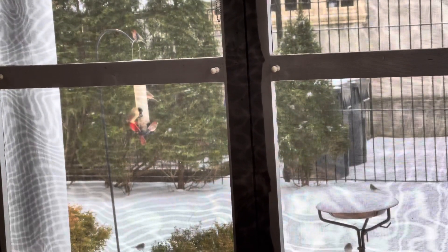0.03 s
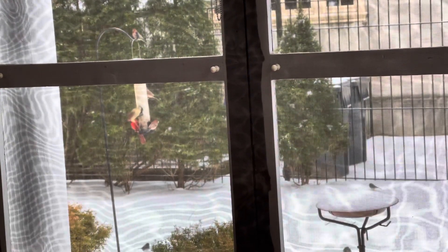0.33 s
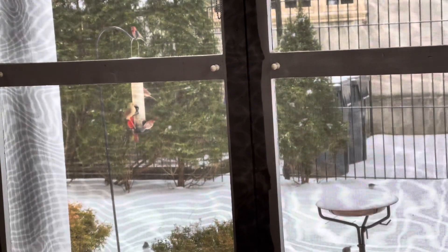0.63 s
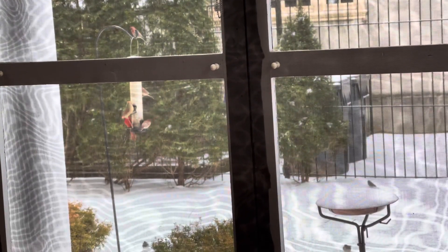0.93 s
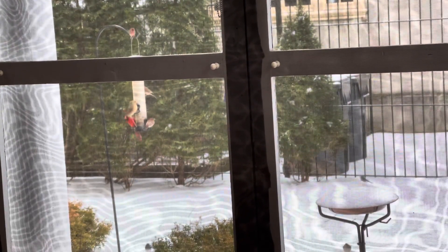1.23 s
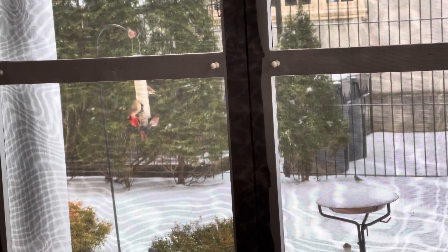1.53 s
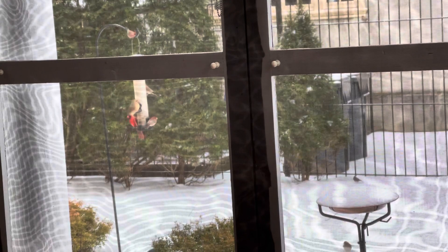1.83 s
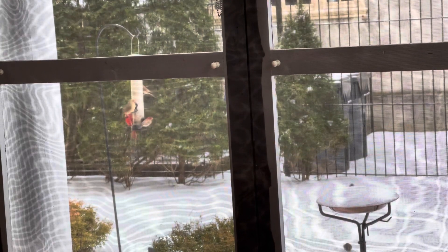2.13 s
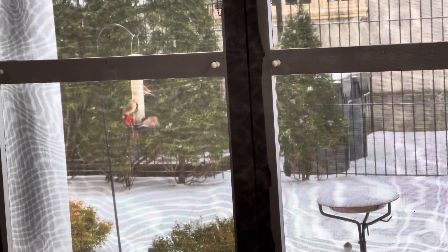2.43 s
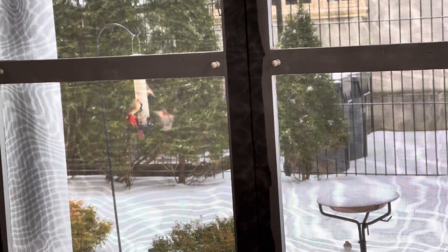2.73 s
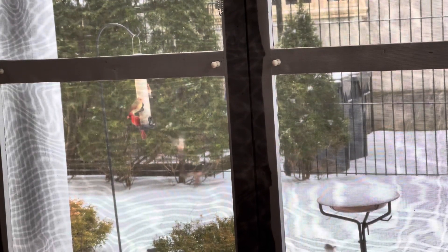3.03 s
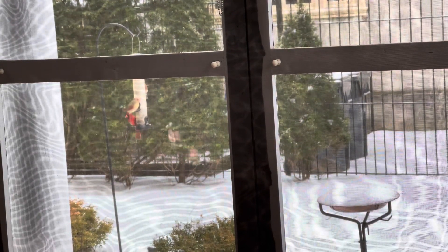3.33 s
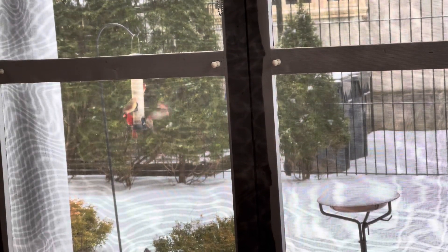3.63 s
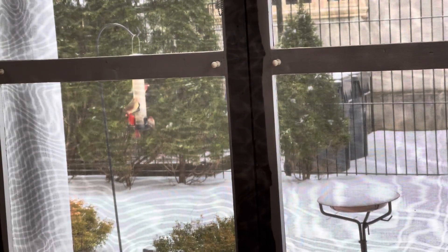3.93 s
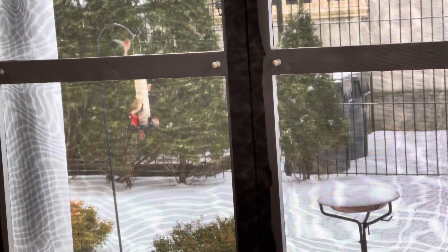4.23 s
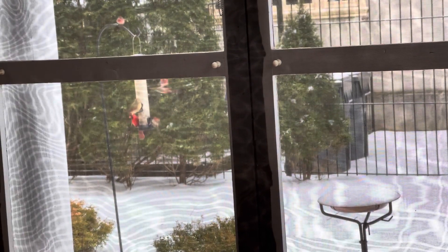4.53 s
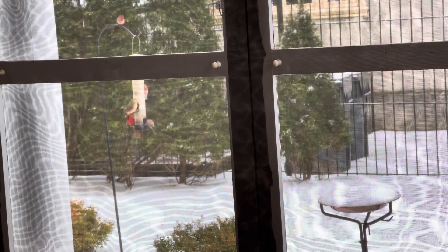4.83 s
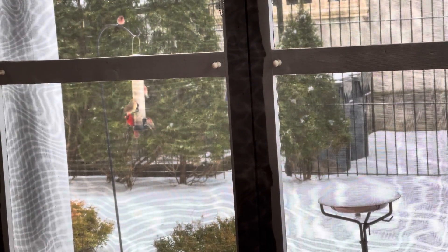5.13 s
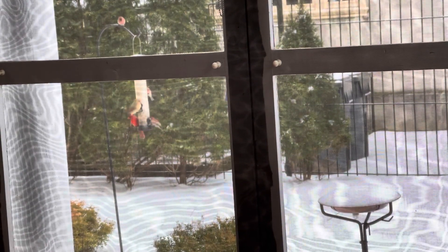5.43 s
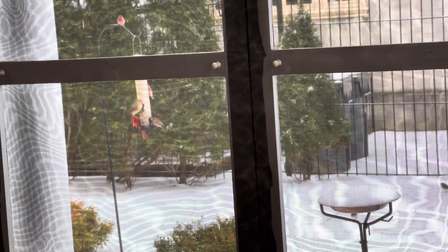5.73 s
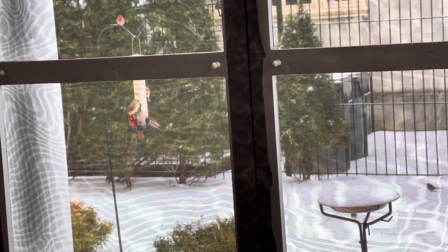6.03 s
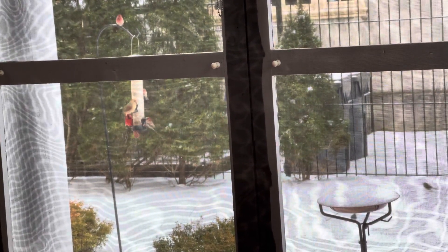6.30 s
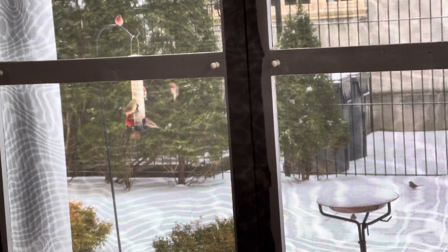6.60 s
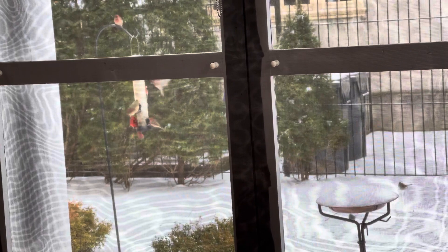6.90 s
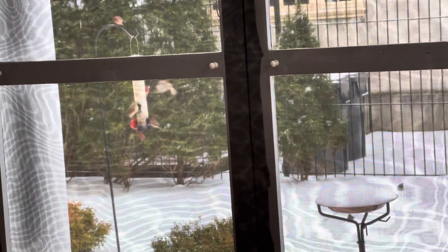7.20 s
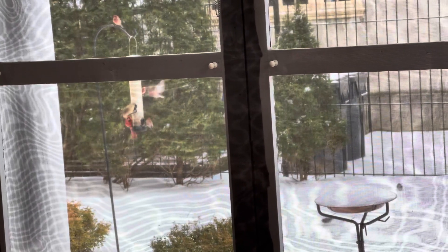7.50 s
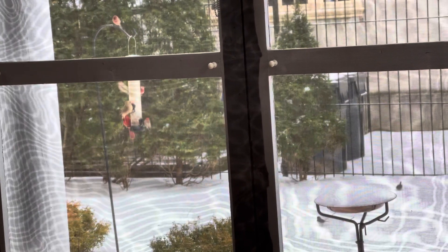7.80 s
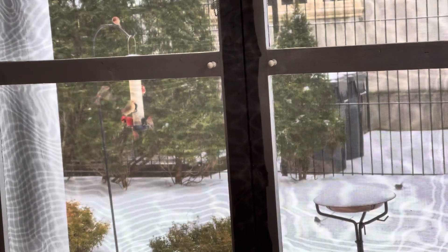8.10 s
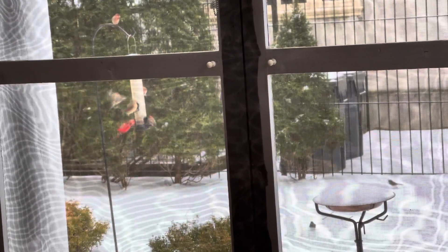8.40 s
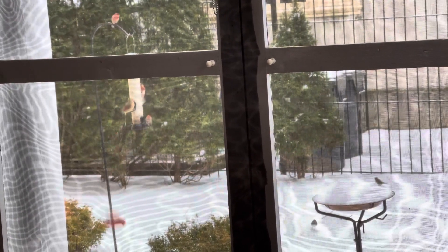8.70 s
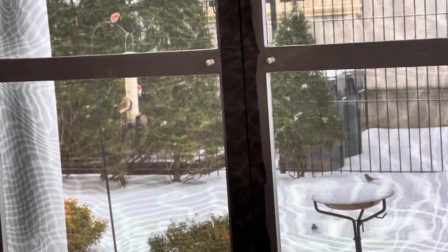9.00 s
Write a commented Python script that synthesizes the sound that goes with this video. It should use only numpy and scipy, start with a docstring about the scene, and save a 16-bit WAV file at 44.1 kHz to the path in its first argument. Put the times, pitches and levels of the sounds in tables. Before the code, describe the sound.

Small birds chirp softly around a feeder over the constant high hiss of falling ice grains and a few faint, crisp clicks. After the first run of chirps come a brief high whistle and very faint, distant piping. Then one sharp knock rings briefly off the yard walls as clearer chirps follow, with a last pair after a pause. The hand-held microphone picks up a low, uneven rumble and soft bumps.

```python
"""Birds at a feeder in the sleet

Small birds chirp in short series in a snowy yard, each singing with both sides of its voice box.
One bird gives a thin high whistle, another pipes far away; there is one sharp knock and a few clicks.
Countless ice grains make a steady hiss, and walls throw the other sounds back.
A low rumble and soft handling bumps reach the hand-held microphone."""
import sys
import numpy as np
from scipy import signal
from scipy.fft import rfft, irfft
from scipy.io import wavfile

SR = 44100
rng = np.random.default_rng(int(sys.argv[2]) if len(sys.argv) > 2 else 0)


def bounce(signal):
    """Save signal as a 16-bit WAV file at the path given by the first command-line argument."""
    frames = np.transpose(np.atleast_2d(signal))
    limited = np.clip(frames, -1, 1)
    pcm = np.round(limited * 32767).astype(np.int16)
    wavfile.write(sys.argv[1], SR, pcm)


N = 403515
TIME = np.arange(N) / SR


def gain_of(db):
    """Turns decibels into a number to multiply a sound by."""
    return 10 ** (np.asarray(db) / 20)


def evened(x):
    """Scales a signal to an average (rms) size of one."""
    return x / np.sqrt(np.mean(x ** 2) + 1e-20)


def value_at(points, hz):
    """Looks up a curve between its points, with frequency spaced by octaves."""
    f, value = np.transpose(points)
    return np.interp(np.log(hz + 1), np.log(f + 1), value)


def add(mix, s, sound):
    """Mixes a sound in, starting at s seconds."""
    part = mix[..., max(round(s * SR), 0):][..., :sound.shape[-1]]
    part += sound[..., :part.shape[-1]]


def wander(size, rate_hz):
    """A smooth random wobble of average size one."""
    hz = np.fft.rfftfreq(size, 1 / SR)
    return evened(irfft(rfft(rng.standard_normal(size)) * np.exp(-(hz / rate_hz) ** 2), size))


def phase_of(hz):
    """The running angle of a wave whose pitch changes."""
    return 2 * np.pi * np.cumsum(hz) / SR


def filtered(x, order, hz, kind):
    """Keeps what is above one frequency ("high") or between two ("band")."""
    return signal.sosfilt(signal.butter(order, hz, kind, fs=SR, output="sos"), x)


# Each row: frequency in Hz, how alike left and right are (1 means the same).
STEREO_LIKENESS = [(60, 1), (125, 1), (250, 0.92), (600, 0.67), (1000, 0.445), (1600, 0.52), (2200, 1),
                   (3200, 1), (6000, 1), (14000, 1)]


def coloured(pair, spectrum):
    """Gives two unrelated noises a tone colour and makes them partly alike."""
    hz, (a, b) = np.fft.rfftfreq(N, 1 / SR), rfft(pair)
    same = np.clip(value_at(STEREO_LIKENESS, hz), -1, 1)
    stereo = np.array([a, same * a + np.sqrt(1 - same ** 2) * b])
    return evened(irfft(stereo * gain_of(value_at(spectrum, hz)), N))


# How long the yard rings. Each row: frequency in Hz, seconds to fade by 60 dB.
YARD_FADE = [(300, 0.37), (1300, 0.36), (3500, 0.32), (8000, 0.2), (14000, 0.15)]


def yard(x, near_db, tail_db, spread=0.15, near_s=0.0087):
    """Adds quick bounces off nearby surfaces, then a fading tail scattered by fence and hedge."""
    size = SR * 3 // 5
    near, scatter = rng.standard_normal((2, 2, size)) * (rng.random((2, 2, size)) < .12)
    age = np.arange(size) / SR
    near = near * np.exp(-age / near_s) * (age > .002)
    hz, t, bands = signal.stft(scatter, SR, nperseg=256)
    decay = gain_of(-60 * t / value_at(YARD_FADE, hz)[:, None]) * (1 - np.exp(-t / .012))
    tail = signal.istft(bands * decay, SR, nperseg=256)[1][:, :size]
    near *= gain_of(near_db) / np.linalg.norm(near[0])
    tail *= gain_of(tail_db) / np.linalg.norm(tail[0])
    mid, side = near + tail
    response = np.array([mid + spread * side, mid - spread * side])
    response[:, 0] += 1  # the sound that arrives directly
    return signal.oaconvolve(x[None], response, axes=1)[:, :N]


# The tone colours of the air and the rumble. Each row: frequency in Hz, relative level in dB.
AIR_COLOUR = [(20, -33), (60, 8.5), (130, -3), (300, -5.5), (500, -8), (1000, -16.5), (1300, -15.5),
              (1700, -18.5), (3000, -25), (8000, -48)]
RUMBLE_COLOUR = [(15, -45), (25, -31), (48, 0.5), (72, 1), (109, -3.5), (190, -17.5), (330, -21.5),
                 (600, -38), (1200, -59), (3000, -110)]
# How the rumble swells. Each row: time in seconds, relative level in dB.
RUMBLE_SWELLS = [(0, -51.5), (.55, -73), (.7, -53.5), (1.35, -49), (2.15, -63), (2.35, -51), (2.6, -47),
                 (2.76, -60), (3.3, -47), (4.2, -43.5), (6.3, -44.5), (6.8, -40.5), (7.03, -56.5),
                 (7.45, -47.5), (7.56, -65), (8.25, -49.5), (8.95, -68), (9.07, -41.5)]


def air_and_rumble(air_db=-56.5, rumble_db=-1, lumps_db=1.5):
    """Steady outdoor air, and a lumpy low rumble that comes and goes."""
    level_db = rumble_db + np.interp(TIME, *np.transpose(RUMBLE_SWELLS)) + lumps_db * wander(N, 10.0)
    rumble = coloured(rng.standard_normal((2, N)), RUMBLE_COLOUR) * gain_of(level_db)
    return rumble + gain_of(air_db) * coloured(rng.standard_normal((2, N)), AIR_COLOUR)


# The tone colour of the hiss. Each row: frequency in Hz, relative level in dB.
SLEET_COLOUR = [(800, -34.5), (1900, -16), (2400, -11), (3200, -7.5), (4000, -10), (5500, -7), (6500, -5),
                (7300, -4), (9000, -1), (10700, 3), (12000, -8.5), (13400, -33.5), (15700, -21.5),
                (16800, -47)]


def sleet(start_db=-52.5, growth_db_per_s=0.2941, grains_per_s=1500, grain_db=-6, flicker_db=1.35):
    """Countless ice grains merge into a slowly growing hiss; the nearer ones tick out of it."""
    sizes = gain_of(2.0 * np.minimum(rng.exponential(1, (2, N)), 5))
    grains = sizes * rng.choice([-1, 1], (2, N)) * (rng.random((2, N)) < grains_per_s / SR)
    hiss = coloured(rng.standard_normal((2, N)) + gain_of(grain_db) * evened(grains), SLEET_COLOUR)
    return hiss * gain_of(start_db + growth_db_per_s * TIME + flicker_db * wander(N, 20.4))


# One row: start in seconds, length in seconds, pitch in Hz, level in dB.
THIN_TONE = (1.26, 0.5, 1298, -68.5)


def faint_tone():
    """A thin tone swells briefly out of the hiss."""
    s, length, hz, db = THIN_TONE
    out, t = np.zeros(N), np.arange(0, length, 1 / SR)
    add(out, s, gain_of(db) * np.hanning(len(t)) * np.sin(2 * np.pi * hz * t))
    return out


# Each row: time in seconds, level in dB, a pitch in Hz that the bump sinks through.
HANDLING_BUMPS = [(0.676, -42.5, 60), (0.82, -44, 54.4), (1.109, -45.5, 136), (2.335, -43, 63),
                  (4.113, -41, 70), (6.379, -42, 62), (6.501, -26, 91), (6.628, -37.5, 112),
                  (6.696, -33, 80), (7.288, -42.5, 133.4), (7.449, -45, 134), (8.169, -44, 161),
                  (8.26, -49, 142), (9.043, -37.5, 126.8)]


def bumps(rise_s=0.013, settle_s=0.0088, rub=0.71):
    """The hand on the microphone makes dull pushes that sink in pitch, with a little rubbing."""
    out, t = np.zeros(N), np.arange(SR // 6) / SR
    for s, db, hz in HANDLING_BUMPS:
        sinking_hz = hz * (0.824 + 1.5 * np.exp(-t / settle_s))
        push = np.sin(phase_of(sinking_hz)) + rub * wander(len(t), 2.44 * hz)
        add(out, s - .004, gain_of(db) * push * t / rise_s * np.exp(1 - t / rise_s))
    return filtered(out, 4, 38, "high")


# Each row: start in seconds, level in dB, centre and width of the noise in Hz,
# snap in dB above that level, seconds to fade by 60 dB.
RUSTLING_CLICKS = [(.296, -52, 6970, 2000, 1, 0.1), (.6722, -43.5, 7400, 2420, 2, 0.163),
                   (.717, -53, 8000, 1200, 7, .04), (.7615, -45, 6900, 2400, 3, .15),
                   (1.498, -51, 7000, 2600, -6, 0.14), (1.529, -48, 9100, 1800, -2, 0.045),
                   (2.183, -55, 8400, 1200, 7, .04), (3.078, -45.5, 6460, 1800, 0, 0.099),
                   (3.657, -37.5, 11600, 1900, 2, 0.046), (3.657, -51, 5930, 2500, 0, .09),
                   (5.008, -53.5, 6500, 1800, -14, .14), (5.659, -51, 8300, 2000, 2, .073),
                   (7.803, -46.5, 7000, 2600, -1, .076), (8.104, -49, 7600, 2600, 2.5, 0.035),
                   (8.393, -45, 6700, 1300, 5.5, 0.061)]


def clicks(grain_db=3.0, rise_s=0.0007, snap_s=0.0015):
    """Each click opens with a crisp snap and trails off in a bright, grainy rustle."""
    out, t = np.zeros(N), np.arange(SR // 4) / SR
    hz = np.fft.rfftfreq(len(t), 1 / SR)
    for s, db, centre_hz, width_hz, snap_db, fade_s in RUSTLING_CLICKS:
        band = np.exp(-.5 * ((hz - centre_hz) / width_hz) ** 2)
        burst = irfft(rfft(rng.standard_normal(len(t))) * band, len(t))
        rustle = gain_of(grain_db * wander(len(t), 240.0) - 60 * t / fade_s)
        shape = np.minimum(t / rise_s, 1) * (gain_of(snap_db) * np.exp(-t / snap_s) + rustle)
        add(out, s, gain_of(db) * evened(burst) * shape)
    return filtered(out, 4, [2800, 13500], "band")


# A light touch, then the blow. Each row: start in seconds, level in dB,
# brightness in dB per octave, crack in dB above that level.
KNOCK_HITS = [(6.8226, -32, 13.5, -5), (6.8277, -14.5, 0.5, -13)]
# The struck thing's tones. Each row: pitch in Hz, relative level in dB, seconds to fade by 60 dB.
KNOCK_TONES = [(1273, 0.5, 0.025), (1540, -4, 0.019), (1890, -10.5, 0.0184), (2130, -10, 0.022),
               (2310, -13.5, 0.0212), (2820, -17, .016), (4560, -20, .01), (6500, -31, 0.013),
               (8750, -32, .014)]
# Each row: delay in seconds, level in dB compared with the hit.
WALL_ECHOES = [(0.0207, -17), (0.052, -23)]


def knock(contact_s=0.00034, crack_s=.0095):
    """Two quick hits ring the same short tones, each with a crack; the nearest walls answer."""
    out, t = np.zeros(N), np.arange(SR // 8) / SR
    for s, db, bright_db, crack_db in KNOCK_HITS:
        ring = np.zeros(len(t))
        for k, (hz, tone_db, fade_s) in enumerate(KNOCK_TONES):
            tilt_db = bright_db * np.log2(hz / KNOCK_TONES[0][0])
            ring += (-1) ** k * gain_of(tone_db + tilt_db - 60 * t / fade_s) * np.sin(2 * np.pi * hz * t)
        crack = filtered(rng.standard_normal(len(t)), 1, [1800, 9500], "band") * np.exp(-t / crack_s)
        hit = gain_of(db) * (ring + gain_of(crack_db) * crack) * (1 - np.exp(-t / contact_s))
        add(out, s, hit)
        for delay, echo_db in WALL_ECHOES:
            add(out, s + delay, gain_of(echo_db) * hit)
    return filtered(out, 6, [1130, 13000], "band")


def piping(first_s=5.395, gap_s=.137, slowing_s=0.0019, note_s=0.086, top_hz=2150, middle_db=-62):
    """A far bird repeats one softly arched, unsteady note, in a run that swells, slows and fades."""
    out, u = np.zeros(N), np.linspace(-1, 1, round(note_s * SR))
    for k, place in enumerate(np.linspace(-1, 1, 8)):
        s = first_s + k * (gap_s + k * slowing_s)
        hz = top_hz * (1 - 0.035 * u ** 2 + 0.01 * wander(len(u), 90))
        db = middle_db - 1.5 * place ** 2 + 3.0 * wander(len(u), 40)
        add(out, s - note_s / 2, gain_of(db) * np.hanning(len(u)) * np.sin(phase_of(hz)))
    return out


# Each row: start and length in seconds, middle pitch and slide in Hz, level in dB,
# wobble as a share of the pitch.
BIRD_PIPS = [(0.772, 0.025, 6560, -900, -51, 0.013), (1.781, .018, 5100, -500, -55.5, 0.068),
             (2.175, 0.013, 8600, -1000, -58, 0.054), (2.872, .022, 4660, 500, -62, .03),
             (3.729, 0.018, 5740, 1407, -59, .05), (4.384, .014, 9000, -800, -54.5, .04)]


def pips():
    """Other birds keep in touch with tiny sliding calls, some clear and some buzzy."""
    out = np.zeros(N)
    for s, length, middle_hz, slide_hz, db, wobble in BIRD_PIPS:
        u = np.linspace(-.5, .5, round(length * SR))
        hz = (middle_hz + slide_hz * u) * (1 + wobble * wander(len(u), 700))
        add(out, s, gain_of(db) * evened(np.hanning(len(u)) * np.sin(phase_of(hz))))
    return out


# Each row: time of the flick's peak in seconds, rise in Hz, half its length in seconds.
WHISTLE_FLICKS = [(5.365, 1686, .007), (5.392, 1905, 0.0095)]


def whistle(start_s=5.27, length_s=0.15, rest_hz=6970, drop_hz=3050, settle_s=0.028, rest_db=-40):
    """A bird's thin note slides down, then flicks up twice; the higher it goes, the louder it is."""
    out, t = np.zeros(N), np.arange(0, length_s, 1 / SR)
    hz = rest_hz + drop_hz * np.exp(-t / settle_s)
    for s, rise_hz, half_s in WHISTLE_FLICKS:
        hz += rise_hz * np.exp(-((start_s + t - s) / half_s) ** 2)
    hz *= 1 + 0.0116 * wander(len(t), 600)
    shape = np.minimum(t / 0.007, 1) ** 2 * np.minimum((length_s - t) / 0.014, 1)
    level = gain_of(rest_db + 20.5 * np.log2(hz / rest_hz))
    add(out, start_s, shape * level * np.sin(phase_of(hz)))
    return out


def chirp(lower_hz, upper_hz, db, upper_db, bright_db, climb_s, fall_s, rasp, foot_db, end_db,
          settle_hz=2888, roundness=2.3, flutter_db=2.7, beak_hz=2350):
    """Both voices scoop up and settle; some chirps are clear, others raspy or bright with overtones."""
    t = np.arange(-1.35 * climb_s, 1.2 * fall_s, 1 / SR)
    u = t / np.where(t < 0, climb_s, fall_s)  # -1 at the foot of the climb, 0 at the top, 1 at the end
    foot = np.where(u < 0, .745, settle_hz / lower_hz)  # as a share of the top pitch
    arch = 1 - (1 - foot) * np.tanh(abs(u) ** roundness) / np.tanh(np.sqrt(2))
    wobble = .068 * rasp ** 1.424 * np.interp(u, [-1, 0, 1], [.35, 1, .7])  # raspiest at the top
    lower = phase_of(lower_hz * arch * (1 + wobble * wander(len(t), 420)))
    upper = phase_of(upper_hz * arch * (1 + wobble * wander(len(t), 420)))
    lower_gain = gain_of(flutter_db * wander(len(t), 840))
    upper_gain = gain_of(upper_db + flutter_db * wander(len(t), 840))
    swell = gain_of(np.interp(u, [-0.96, -1.25, 0, 0.97], [-11, -7, 0, end_db]))
    voices = swell * lower_gain * np.sin(lower) + np.exp(-(u / 0.87) ** 2) * upper_gain * np.sin(upper)
    overtone_swell = gain_of(np.interp(u, [-1, 0, 1], [foot_db, 0, -10]))
    overtones = overtone_swell * (1.26 * np.sin(2 * lower) + 0.83 * np.sin(3 * lower))
    overtones += np.exp(-(u / 0.96) ** 2) * (0.7 * np.sin(lower + upper) + .9 * np.sin(2 * upper))
    overtones = filtered(overtones, 4, 5700, "high")
    sound = np.sqrt(2) * voices + gain_of(bright_db - 3.5) * lower_gain * overtones
    sound *= signal.windows.tukey(len(t), .2) * gain_of(db + 0.06)
    return t[0], filtered(sound, 5, beak_hz, "high")  # a small beak sends out low pitches weakly


# Each chirp is an arch in pitch. Each row: time of the top in seconds, top pitches of the lower and
# upper voice in Hz, level in dB, relative levels of the upper voice and overtones in dB,
# climb and fall in seconds, rasp from 0 to 1, then the overtones at the foot and
# the lower voice at the end, both in dB compared with the top.
FEEDER_CHIRPS = [(.97, 3070, 4000, -62.5, -12, -16, 0.022, 0.022, 0.93, -3, -6),
                 (1.76, 3760, 4600, -65, -4, -15, 0.0263, .035, .8, -3, -4),
                 (2.105, 2990, 3900, -61.5, -13.5, -16, 0.027, 0.0275, .3, -3, -2),
                 (2.153, 3500, 4260, -61.5, -4, -16, 0.032, .02, .3, -3, -6),
                 (2.484, 3263, 4120, -51, -4, -13, 0.037, 0.026, 0.36, 6.5, 2.5),
                 (2.518, 3357, 4200, -54.5, -3, -9, 0.024, .016, 0.44, -3, -6),
                 (2.665, 3530, 4360, -50, -8, -5.5, 0.04, 0.022, 0.91, 4, 0),
                 (2.815, 3195, 4290, -47, -10.5, -1.5, 0.033, 0.026, 0.75, -11, -6),
                 (2.967, 3215, 4320, -51, -5.5, 4, 0.033, 0.039, 0.62, -4, -4),
                 (3.11, 3257, 4120, -49, -4.5, 0, 0.042, 0.027, .8, -6, -5),
                 (3.243, 3295, 4110, -48.5, -7.5, -3.5, 0.026, 0.033, 0.81, -2, -2),
                 (3.426, 3416, 4280, -49.5, -5, -2.5, 0.024, 0.023, 0.86, -11, 2),
                 (3.579, 3340, 4370, -51, -7, -13, 0.023, .028, .8, -4, 0.5),
                 (3.901, 3420, 4300, -54.5, -6.5, -18, 0.0352, 0.026, 0.89, -4.5, -2),
                 (4.068, 3450, 4260, -56.5, -2, -18, 0.031, 0.026, .7, -3, -1),
                 (4.235, 3873, 4830, -54.5, -3, -17, 0.034, .024, .3, -8, -6),
                 (4.258, 3445, 4200, -52.5, -4, -1, 0.03, 0.0304, 0.93, -11, -3),
                 (4.44, 3840, 4730, -55, -4.5, -13, 0.026, 0.022, 0.57, -8, -6),
                 (4.585, 3830, 4790, -49.5, 0.5, 0, 0.029, 0.021, .3, -12, -3),
                 (4.731, 3760, 4760, -48, 0.5, -0.5, 0.025, .018, 0.325, -6, -6),
                 (4.972, 3750, 4700, -55, -3, -23, .026, 0.02, .3, -8, -6),
                 (5.339, 3430, 4230, -55, -8, -12, 0.0341, 0.0225, .4, -3, -1),
                 (6.486, 3330, 3940, -66, -0.5, -17, .028, .028, .55, -3, -4),
                 (6.742, 3754, 4580, -50, -5, -3, 0.027, 0.022, 0.46, -9, -1),
                 (6.862, 3695, 4540, -43.5, -3.5, -3, .027, .02, 0.27, -9, -6),
                 (6.985, 3730, 4505, -42, -1, -10, .027, 0.0221, 0.12, 6, 1),
                 (7.061, 3550, 4600, -55, -6, 1, 0.025, .022, 0.56, -8, -6),
                 (7.195, 3716, 4480, -50, -2, 1, 0.031, 0.02, 0.416, -2, 1.5),
                 (7.227, 3720, 4720, -48, -5, 5, .027, .021, 0.35, -12, -6),
                 (7.378, 3656, 4705, -45, -5.5, 5.5, 0.036, .025, 0.18, -13, -7),
                 (7.582, 3705, 4720, -46.5, -3.5, -16, 0.017, 0.02, 0.17, -8, -7),
                 (8.836, 3340, 4230, -51.5, -7.5, -11, 0.039, 0.029, 0.65, -3, -3),
                 (9.008, 3396, 4220, -50.5, -5, -3.5, 0.0441, .033, 0.71, -2, -5)]


def chirps():
    """The birds hop about, so each chirp comes back from the yard by its own paths."""
    out = np.zeros((2, N))
    for s, *shape in FEEDER_CHIRPS:
        offset_s, sound = chirp(*shape)
        add(out, s + offset_s, yard(sound, near_db=-2, tail_db=-5.5, spread=0.29, near_s=.009))
    return out


def scene():
    """Birds, knock and clicks sound in the yard, over sleet and rumble."""
    birds = chirps() + yard(whistle() + pips(), near_db=-3.5, tail_db=-5.5)
    far_bird = yard(piping(), near_db=-16, tail_db=-12.0)
    blow = yard(knock(), near_db=-13, tail_db=-9.0, spread=0.35)
    blow *= gain_of([[.7], [-.7]])  # a little to the left
    rustles = yard(clicks(), near_db=-32, tail_db=-6.0)
    return birds + far_bird + blow + rustles + sleet() + air_and_rumble() + bumps() + faint_tone()


# Each row: frequency in Hz, how far the left wave lags the right in radians.
LEFT_LAG = [(0, 0), (50, .28), (160, .4), (350, .05), (1200, 0), (1700, .55), (2300, 0), (3100, -.4),
            (4300, -.1), (5000, 0), (8800, 0), (9100, 1.1), (10250, 3.1), (11000, 4.6), (11700, 6.2),
            (12900, 6.5), (13700, 9.4), (14700, 12.6)]


def record(dry, top_hz=15900):
    """The left and right channels are out of step, most in the high treble; the very top is cut."""
    hz = np.fft.rfftfreq(N, 1 / SR)
    lag = np.interp(hz, *np.transpose(LEFT_LAG))
    stereo = irfft(rfft(dry) * np.exp(.5j * np.array([-lag, lag])), N)
    treble_cut = signal.firwin(511, top_hz, window=("kaiser", 9), fs=SR)
    return signal.oaconvolve(stereo, treble_cut[None], "same")


dry = scene()
out = record(dry)
bounce(out)
```